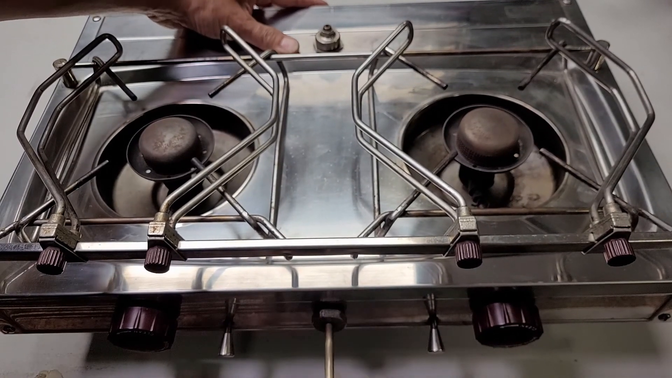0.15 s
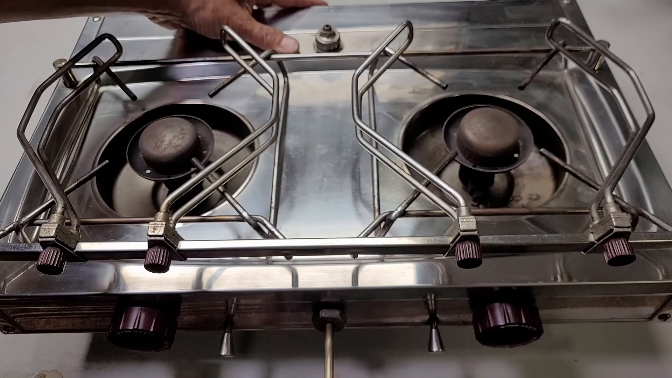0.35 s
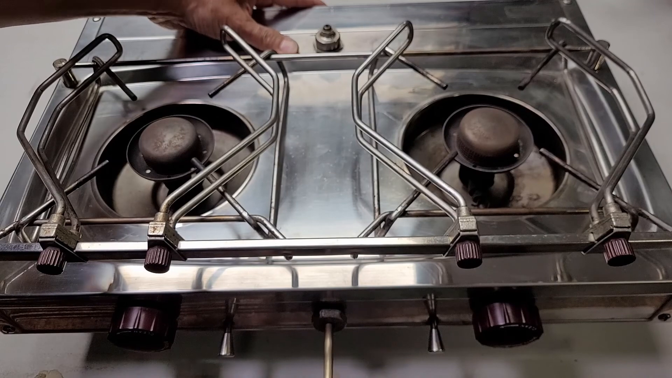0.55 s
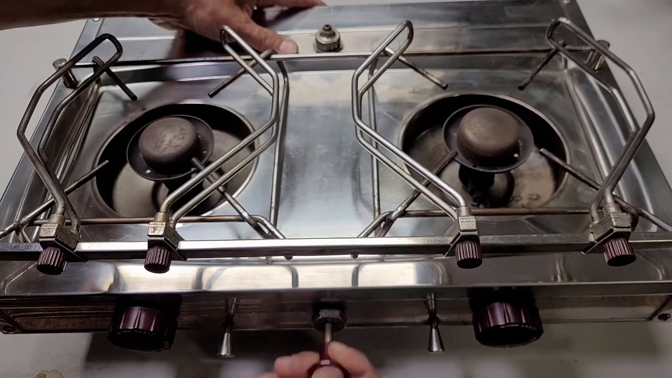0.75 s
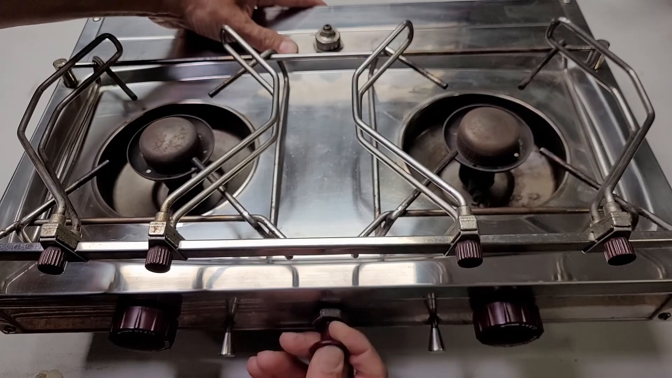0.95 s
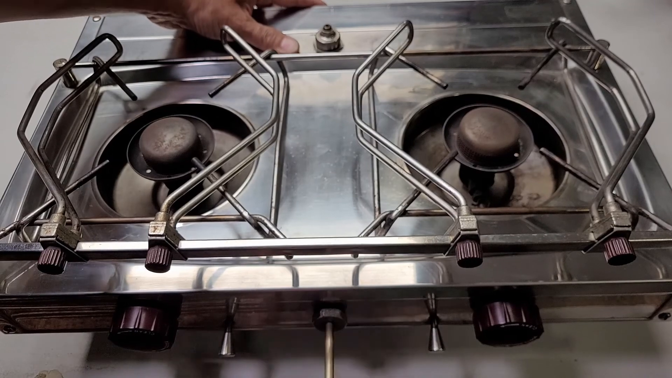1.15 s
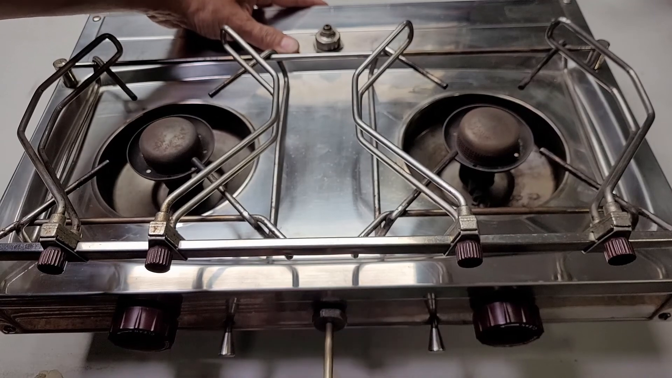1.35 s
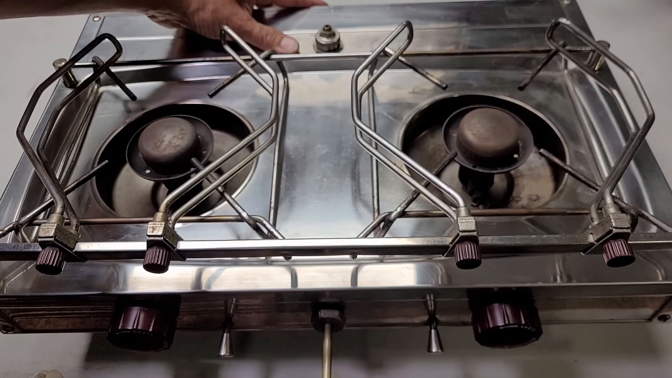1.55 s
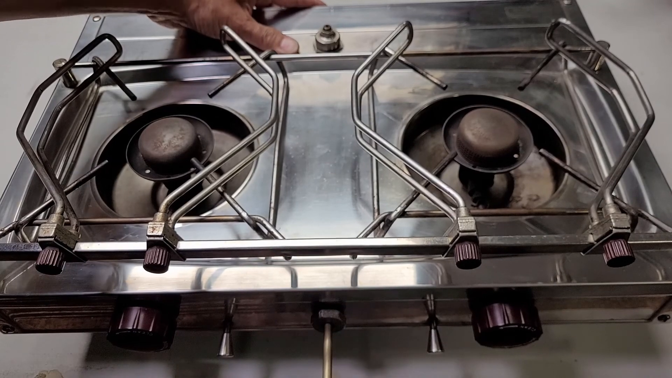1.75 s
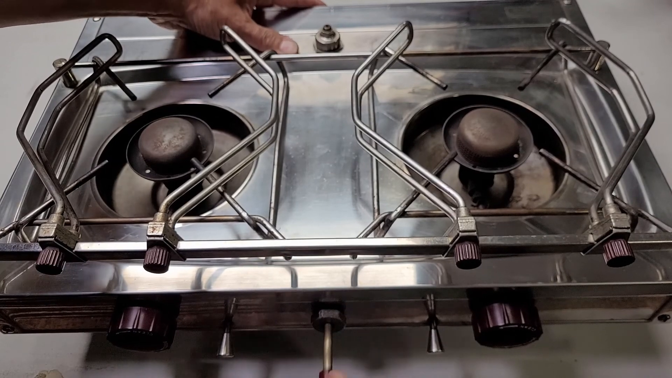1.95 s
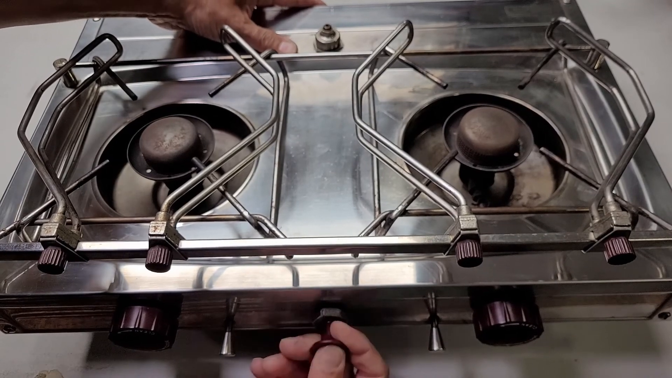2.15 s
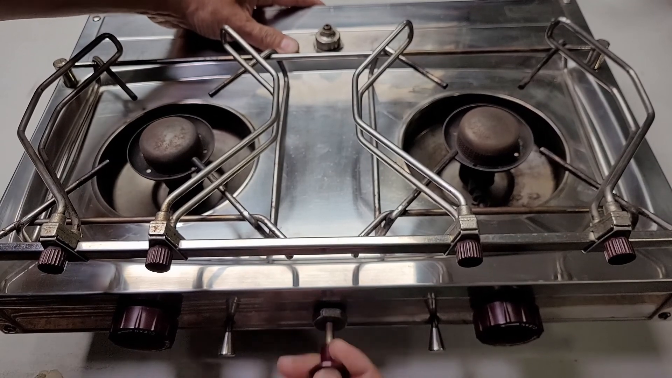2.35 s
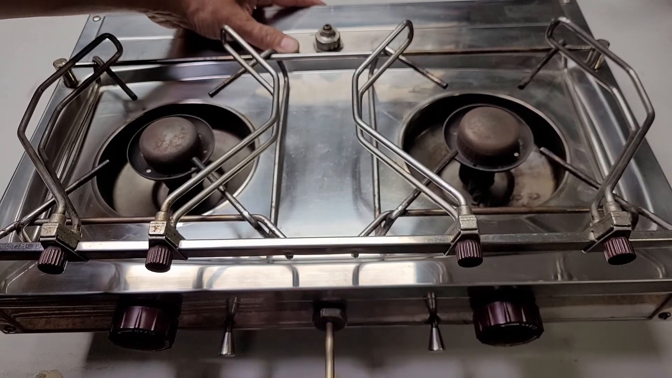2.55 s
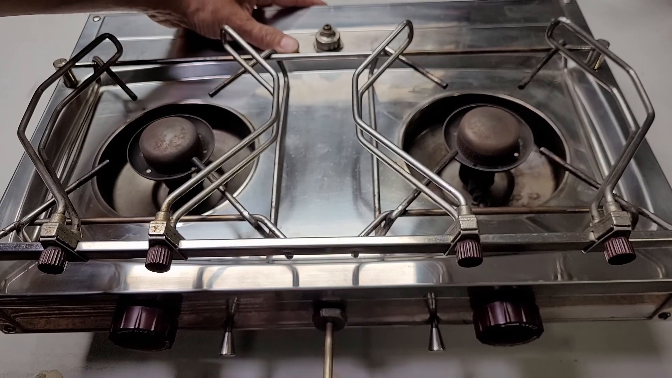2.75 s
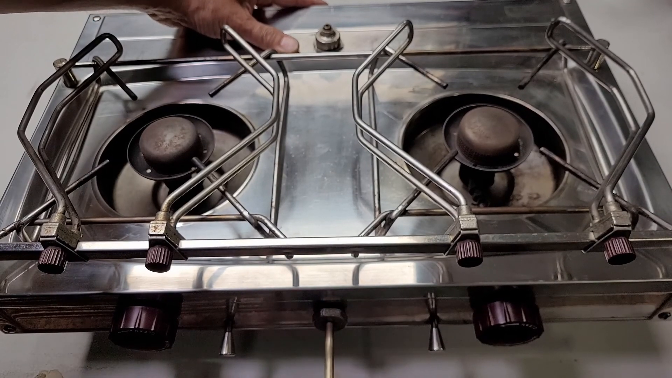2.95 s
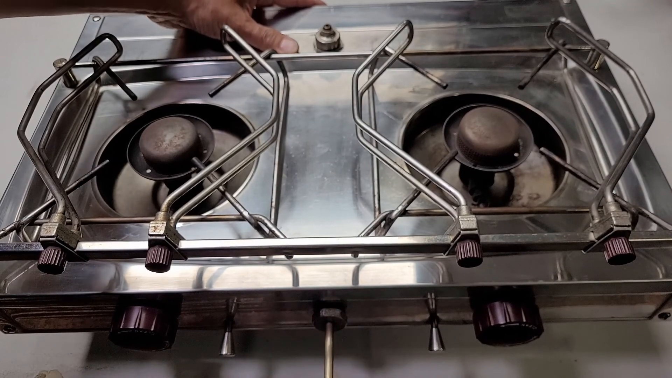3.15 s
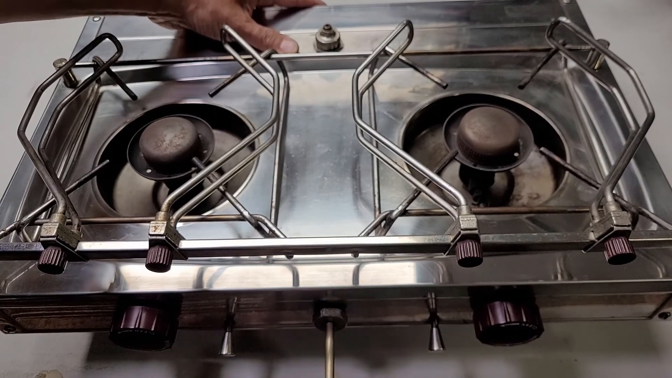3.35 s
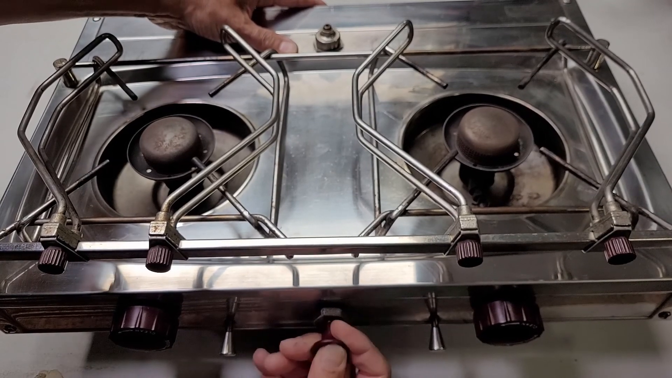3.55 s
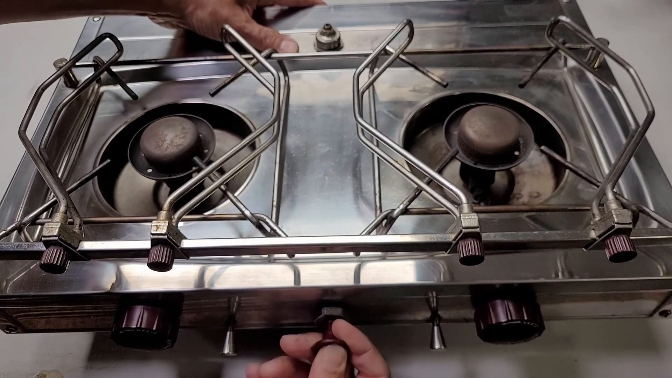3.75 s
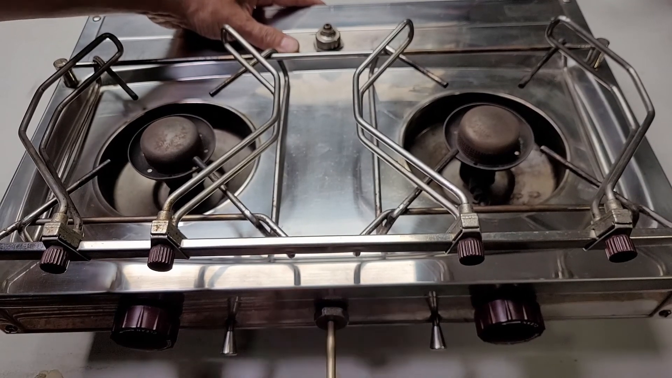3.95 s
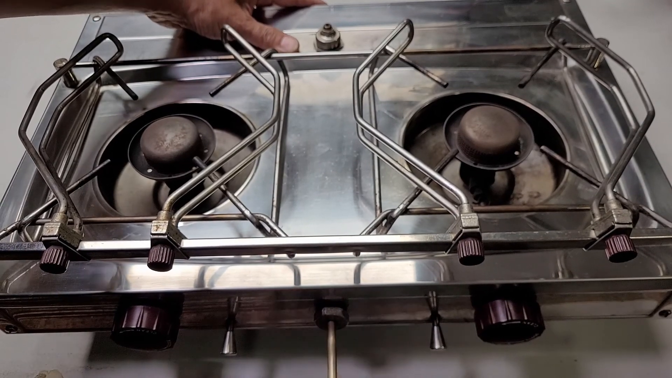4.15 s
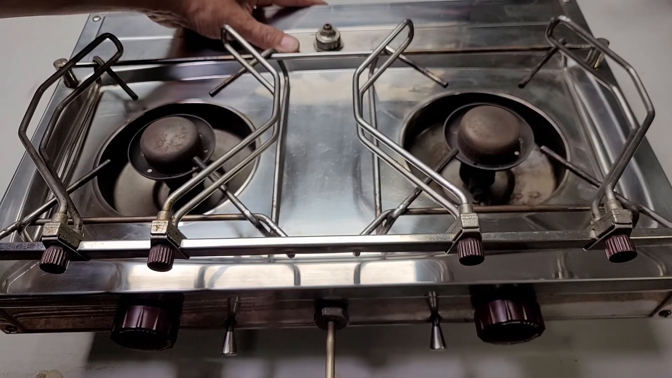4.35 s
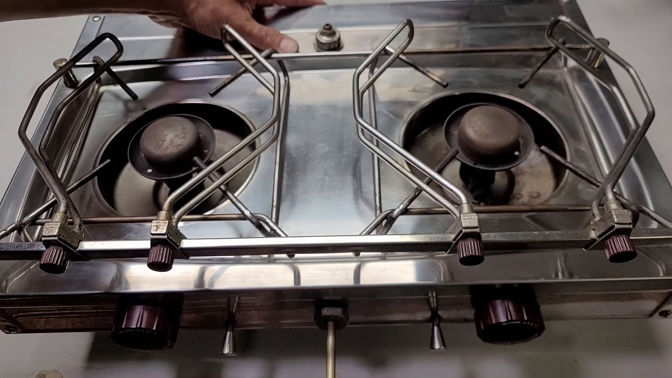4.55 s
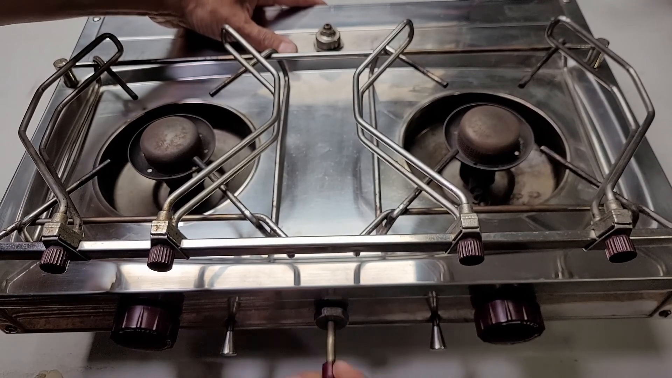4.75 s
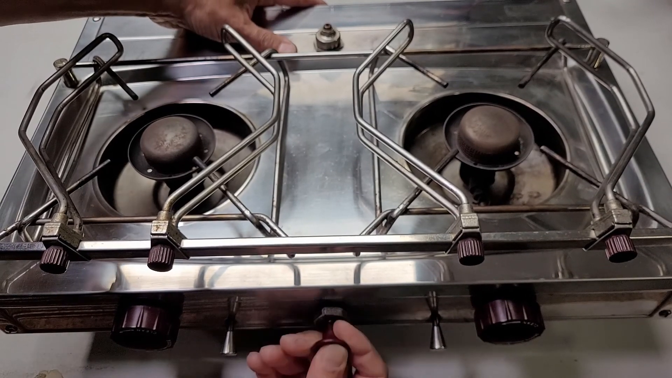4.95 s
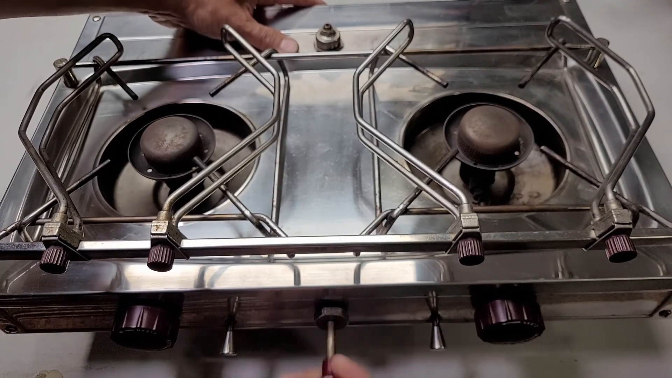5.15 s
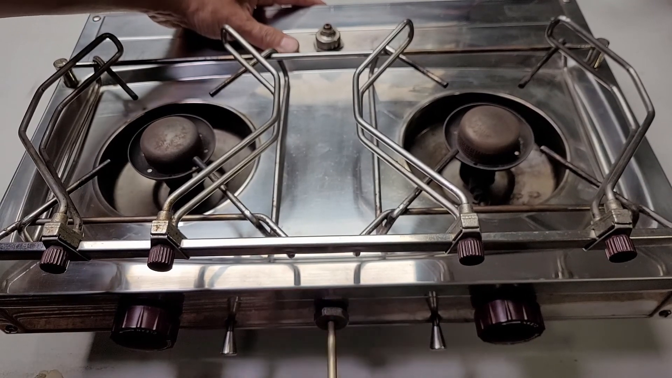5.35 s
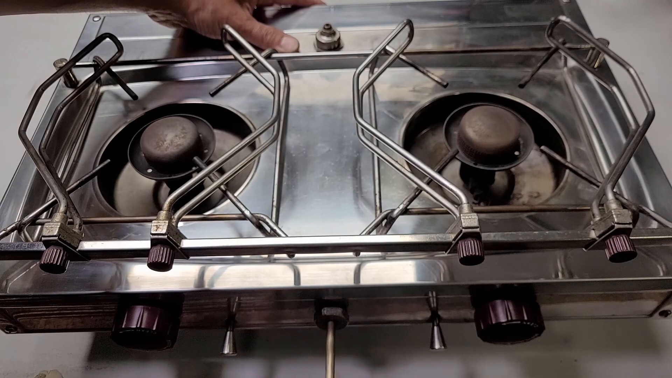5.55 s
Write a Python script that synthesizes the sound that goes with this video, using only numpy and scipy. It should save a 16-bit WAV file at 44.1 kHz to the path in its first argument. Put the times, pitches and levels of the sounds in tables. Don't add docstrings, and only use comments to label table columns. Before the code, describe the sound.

A metal pump rod hisses and judders through its sleeve, slamming home with loud clangs that rattle a sheet-steel stove, close up.

```python
import sys
import numpy as np
from scipy import signal
from scipy.fft import rfft, irfft
from scipy.io import wavfile
from scipy.ndimage import uniform_filter1d

SR = 44100
rng = np.random.default_rng(int(sys.argv[2]) if len(sys.argv) > 2 else 0)


def attenuation_scalar(level_db):
    decades = np.asarray(level_db, float) / 20
    return 10 ** decades


def output_pcm(signal):
    pcm = np.clip(np.atleast_2d(signal).T, -1, 1) * 32767
    wavfile.write(sys.argv[1], SR, np.round(pcm).astype(np.int16))


N = 247401

ALIKE_HZ = 640
LEFT_LAG_S = .0001
BREAK_DB_S, TUG_DB_S = 5000, 2200
PULL_FADE_DB_S, RING_FADE_DB_S = 203, 286

# t/s, peak level/dB, tank level over peak/dB, treble tilt/(dB per octave), rattle/s
SLAMS = [(0.425, -27.5, 2, 3, 0.023), (0.885, -6.5, -7.5, 1.5, 0.03), (1.592, -62, 7, -2.5, 0.046),
         (2.886, -65.5, -5, 3, 0.0064), (2.118, -6, -16.5, 2.5, 0.021), (2.405, -41.5, 8, -4, 0.008),
         (2.965, -60.5, -6.5, -7.5, 0.013), (3.385, -47.5, -14, -1, 0.022), (3.621, -6, -22.5, 2.5, 0.018),
         (4.346, -72.5, 16, 12, 0.01), (4.976, -16.5, 8.5, -0.5, 0.018), (5.202, -45.5, 14, -8, 0.019)]
# t/s, level/dB
REBOUNDS = [
    (0.897, -15.5),
    (0.911, -15),
    (2.138, -9.5),
    (2.146, -14.5),
    (3.641, -11.5),
    (3.648, -14.5),
    (5.012, -28),
]
# t/s, effort level/dB, delay until the washer catches/s
PULLS = [
    (0.0, -43, .05),
    (1.366, -48, .062),
    (2.698, -46, .063),
    (4.176, -48.5, .064),
]
# t/s, peak level/dB
JUDDERS = [
    (0.745, -19),
    (.768, -19.5),
    (.785, -12.5),
    (.82, -7.5),
    (.862, -4),
    (2.066, -11.5),
    (2.091, -6),
    (2.105, -7.5),
    (3.59, -9.5),
    (3.605, -3),
]
# f/Hz, level/(dB per Hz)
CLANG = [(24, -60), (40, -26.5), (155, -15.5), (297, -2.5), (516, -15), (896, -3), (1300, -8.5),
         (1480, -6.5), (1810, -9), (3650, -15.5), (5050, -22), (7540, -23.5), (10400, -31.5), (13100, -29),
         (16000, -33.5)]


def lags(seconds):
    return np.arange(int(seconds * SR)) / SR


def unit(x):
    return x / np.sqrt(np.mean(x ** 2))


def across(table, hz):
    table_hz, values = np.array(table).T
    return np.interp(np.log(np.maximum(hz, 1)), np.log(table_hz), values)


def band(x, hz, width):
    edges = np.clip([hz - width / 2, hz + width / 2], 20, SR * .49)
    return signal.sosfilt(signal.butter(2, edges, "band", fs=SR, output="sos"), x)


def ports(size, colour=None):
    hz = np.fft.rfftfreq(size, 1 / SR)
    apart = 0.023 + 1 / (1 + (ALIKE_HZ / np.maximum(hz, 1)) ** 3.8)
    mid, side = rfft(rng.standard_normal((2, size)))
    pair = mid + np.sqrt(apart) * side * np.array([[1], [-1]])
    tint = 1 if colour is None else attenuation_scalar(across(colour, hz))
    return unit(irfft(pair / np.sqrt(1 + apart) * tint, size))


def modes(table, spread, rise_s, against):
    hz, db, t60 = np.array(table).T[:, :, None]
    t, order = lags(1.), np.arange(len(table))[:, None]
    skew = spread * np.clip(hz / ALIKE_HZ, .33, 2) ** 2
    skew = skew * rng.uniform(0.62, 0.66, (len(table), 1)) * (-1) ** order
    phase = 2 * np.pi * hz * t + np.array([skew, -skew])
    ring = np.sum(against ** order * attenuation_scalar(db - 60 * t / t60) * np.sin(phase), axis=1)
    return ring * (1 - np.exp(-t / rise_s)) ** 2 / np.sqrt(np.sum(attenuation_scalar(db) ** 2))


def wash(colour, rise_s, quicker):
    # f/Hz, t60/s
    fade_times = [(60, 0.51), (250, 0.33), (1000, 0.22), (3000, 0.21), (8000, 0.15), (16000, 0.048)]
    t, noise, out = lags(1.), ports(SR, colour), 0
    for hz in 45 * 2 ** np.arange(0, 9, .5):
        out = out + band(noise, hz, hz * .35) * attenuation_scalar(-60 * t * quicker / across(fade_times, hz))
    return out * (1 - np.exp(-t / rise_s))


def play(force, ring):
    return signal.fftconvolve(np.atleast_2d(force), ring, axes=1)[:, :N]


def steady(ring):
    return ring / np.sqrt(np.sum(ring ** 2) / 2)


def taps(times, sizes, push_s):
    force = np.zeros(N)
    np.add.at(force, np.clip((np.asarray(times) * SR).astype(int), 0, N - 1), sizes)
    push = np.sin(np.pi * lags(push_s) / push_s)
    return np.convolve(force, push / push.sum())[:N]


def slips(rate, scatter_db):
    chance = rng.random((3, N))
    size = attenuation_scalar(-scatter_db * np.log(1 - chance[2]))
    return unit((chance[0] < rate / SR) * np.sign(chance[1] - .5) * size)


def flicker(rate, depth_db):
    k = int(SR / rate)
    return attenuation_scalar(depth_db * uniform_filter1d(np.repeat(rng.standard_normal(N // k + 1), k), k)[:N])


def patchy(colour, rate, depth_db):
    noise, out = ports(N, colour), 0
    for hz in 1900 * 2 ** np.arange(0, 3.5, .5):
        out = out + band(noise, hz, hz * .35) * flicker(rate, depth_db)
    return unit(out)


def swells(s, db, rise_db_s, fall_db_s, hold_s=0):
    late = np.arange(N * 1000 // SR + 2)[:, None] / 1000 - s
    level = db + rise_db_s * np.minimum(late, 0) - fall_db_s * np.maximum(late - hold_s, 0)
    return np.sum(attenuation_scalar(2 * level), axis=1)


def slow(s, spread_s, db):
    late = (np.arange(N * 1000 // SR + 2)[:, None] / 1000 - s) / np.abs(spread_s)
    late = np.abs(late / np.where(late < 0, 0.89, 1))
    return np.sum(attenuation_scalar(2 * (db - 16.5 * late ** 1.47)), axis=1)


def gain(power):
    return np.interp(np.arange(N) / SR * 1000, np.arange(len(power)), np.sqrt(power))


def fast_moves(push_db, pull_db, push_fade_db_s, pull_fade_db_s):
    # start t/s, length/s, effort level/dB
    pushes = [
        (0.745, 0.15, -35.5),
        (2.069, 0.084, -35),
        (3.592, 0.032, -30.5),
    ]
    s, length, effort_db = np.array(pushes).T
    pull_s, pull_effort_db, _ = np.array(PULLS).T
    push = swells(s, effort_db + push_db, BREAK_DB_S, push_fade_db_s, length)
    return push + swells(pull_s, pull_effort_db + pull_db, TUG_DB_S, pull_fade_db_s)


def washer():
    # t/s, length/s, start f/Hz, end f/Hz, level/dB
    squeaks = [(1.26, .06, 3950, 4050, -66), (1.325, .03, 12300, 12900, -62), (1.585, .07, 1495, 1480, -60),
               (2.886, .015, 8300, 8500, -72), (2.922, .04, 11300, 12500, -58),
               (2.965, .012, 15500, 15700, -54), (4.43, .07, 1420, 1410, -64),
               (4.5, .015, 14900, 14300, -62), (4.85, .11, 320, 400, -58), (5.372, .03, 13000, 15300, -57),
               (5.402, .035, 10300, 11000, -59), (5.41, .025, 14900, 15700, -56),
               (5.43, .045, 13100, 13000, -59), (5.445, .04, 1500, 1490, -53),
               (-.01, .04, 12900, 13000, -38), (1.36, .03, 12950, 13050, -41),
               (4.166, .03, 12900, 13000, -49)]
    t, out = np.arange(N) / SR, np.zeros((2, N))
    wobble = flicker(rate=200, depth_db=.04)
    grip = flicker(rate=150, depth_db=3.5)
    for s, length, from_hz, to_hz, db in squeaks:
        along = np.clip((t - s) / length, 0, 1)
        pitch = (from_hz + (to_hz - from_hz) * along ** 0.395) * wobble
        phase = 2 * np.pi * np.cumsum(pitch) / SR
        shift = np.array([[0], [1.1 - 2 * np.pi * to_hz * LEFT_LAG_S]])
        out += attenuation_scalar(db + 3) * grip * np.sin(np.pi * along) * np.sin(phase + shift)
    return out + attenuation_scalar(-13) * play(out[0], steady(wash(None, rise_s=.003, quicker=2.5)))


def sliding():
    # t at fastest/s, spread/s, hiss level/dB, rod ring level over hiss/dB
    creeps = [(.24, 0.072, -75.5, 11), (.4, 0.036, -68, 12), (.588, 0.16, -67.5, 1),
              (1.154, 0.32, -65, -10), (1.319, 0.17, -59, -18), (1.773, .15, -65.5, -3),
              (2.03, 0.56, -75, 4), (2.417, 0.12, -69.5, -5), (2.598, 0.2, -63, -17),
              (2.889, 0.019, -75, 12), (2.972, 0.077, -64, 2.5), (3.242, 0.098, -72.5, 2),
              (3.415, .3, -73, 1.5), (3.561, 0.21, -78, 3.5), (3.9, 0.29, -66.5, -8),
              (4.12, 0.286, -65, -12), (4.351, .05, -78.5, -0.5), (4.541, 0.23, -66.5, 0.5),
              (4.9, .2, -75, 9.5), (5.08, 0.21, -66, -15.5), (5.215, 0.051, -66.5, 2),
              (5.309, 0.14, -59.5, -4), (5.445, 0.098, -59, 0)]
    # t at release/s, level/dB
    leans = [(.725, -69), (1.3, -74), (1.77, -69.5), (2.045, -66.5), (2.589, -77), (2.971, -66),
             (3.575, -60.5), (4.54, -64), (4.86, -64.5), (4.96, -59.5), (5.21, -72.5), (5.425, -63)]
    # t/s, level/dB
    sleeve_strikes = [
        (0.427, -37),
        (4.977, -37),
    ]
    s, spread_s, db, ring_db = np.array(creeps).T
    creep = slow(s, spread_s, db)
    lean = swells(*np.array(leans).T, rise_db_s=140, fall_db_s=260.5)
    lean += swells(*np.array(sleeve_strikes).T, BREAK_DB_S, RING_FADE_DB_S)
    hiss = fast_moves(0, 0, 153, PULL_FADE_DB_S) + creep
    sleeve = fast_moves(-6.5, -5, 306, RING_FADE_DB_S) + lean + creep * attenuation_scalar(2 * -11)
    ring = fast_moves(-2, 6, 306, RING_FADE_DB_S) + slow(s, spread_s, db + ring_db)
    return gain(hiss), gain(sleeve), gain(ring)


def rod():
    # f/Hz, level/(dB per Hz)
    fast_colour = [(1060, -43), (1800, -17), (2180, -5.5), (2590, -15.5), (3200, -4.5), (3540, -10.5),
                   (4100, -6.5), (5200, -2), (6900, 8), (8440, -5), (12300, -4.5), (13400, 1.5),
                   (16000, -20.5)]
    creep_colour = [(1060, -28.5), (1800, -7.5), (3640, -2), (3990, -10.5), (4920, -4), (6900, -3.5),
                    (9000, -7), (9770, -7), (10900, -18), (13300, -8), (16000, -25)]
    # f/Hz, width/Hz, level/dB
    ring_bands = [(4000, 250, -10), (9900, 420, -4), (13000, 260, -2.5)]
    hiss, sleeve, ring = sliding()
    fast = hiss ** 2 / (hiss ** 2 + attenuation_scalar(-47.5) ** 2)
    creep = hiss * np.sqrt(1 - fast)
    bursts = gain(.5 + swells(np.array(JUDDERS)[:, 0], -2, TUG_DB_S, fall_db_s=500))
    out = bursts * hiss * np.sqrt(fast) * attenuation_scalar(3.0) * patchy(fast_colour, rate=90, depth_db=3.5)
    out = out + creep * attenuation_scalar(1.5) * patchy(creep_colour, rate=78, depth_db=1.6)
    above = [np.sqrt(np.maximum(level ** 2 - (hiss * attenuation_scalar(-19)) ** 2, 0)) for level in (sleeve, ring)]
    for (hz, width, db), drive in zip(ring_bands, [creep] + above):
        noise = ports(N)
        locked = .5 + .5 * drive ** 2 / (drive ** 2 + attenuation_scalar(-58) ** 2)
        core = unit(band(noise, hz, width)) * flicker(rate=50, depth_db=3.5)
        skirt = unit(band(noise, hz * 1.06, hz * 0.19))
        out = out + drive * locked * attenuation_scalar(db) * core
        out = out + drive * attenuation_scalar(db + 2.0) * skirt
    return out


def dragging():
    # t at strongest/s, spread/s, shudder level/dB, rub level over shudder/dB
    drags = [(.17, .1, -56, -20), (.49, 0.2, -44.5, -20), (.6, .12, -47, -15), (1.14, 0.077, -37.5, -16),
             (1.292, 0.21, -54, -0.5), (1.62, 0.38, -50.5, -9), (1.826, 0.17, -41, -15),
             (2.34, 0.069, -41, -14), (2.441, 0.04, -48, -21), (2.558, 0.53, -54.5, -2.5),
             (2.96, 0.074, -46, -12.5), (3.11, .05, -60.5, -21), (3.289, 0.12, -46.5, -16.5),
             (3.04, .06, -49.5, -28), (3.45, 0.25, -54, -14), (3.889, 0.11, -40.5, -15),
             (4.1, 0.33, -47, -10.5), (4.467, .3, -50.5, -7.5), (4.639, .2, -50.5, -15.5),
             (4.955, .15, -48, -16), (5.09, 0.21, -42, -17.5), (5.235, 0.075, -31, -42.5),
             (5.351, 0.38, -45, -11.5), (5.525, 0.12, -39, -12)]
    s, spread_s, db, rub_db = np.array(drags).T
    pull_s, pull_db, delay_s = np.array(PULLS).T
    catch = swells(pull_s + delay_s, pull_db + 13.5, BREAK_DB_S, fall_db_s=212, hold_s=0.035)
    shudder = fast_moves(12.5, 9, 153, PULL_FADE_DB_S) + catch + slow(s, spread_s, db)
    rub = fast_moves(-7, 6.5, 153, PULL_FADE_DB_S) + catch * attenuation_scalar(2 * -21)
    rub = rub + slow(s, spread_s, db + rub_db)
    return gain(shudder), gain(rub)


def frame(tank, apron, plate):
    # t/s, peak level/dB, pitch f/Hz
    soft_knocks = [(0.049, -18, 267), (0.237, -37.5, 270), (.584, -31.5, 253), (1.125, -22.5, 234),
                   (1.193, -45, 257), (1.368, -27.5, 283), (1.425, -17, 277), (1.596, -31.5, 259),
                   (1.757, -34.5, 263), (1.833, -42.5, 264.5), (1.893, -47, 324), (2.01, -35.5, 257),
                   (2.285, -27.5, 253), (2.698, -31, 310), (2.76, -20.5, 231), (3.235, -41, 328),
                   (3.271, -36, 227), (3.881, -29, 270), (4.19, -27.5, 267), (4.11, -44, 305),
                   (4.239, -15, 259), (4.404, -38.5, 240), (4.511, -37, 265.5), (4.59, -32.5, 324),
                   (4.894, -42.5, 369), (5.209, -18, 248), (5.273, -29.5, 281), (5.406, -23, 257),
                   (5.446, -19.5, 266), (5.513, -21.5, 313)]
    s, db, hz = np.array(soft_knocks + [(s, db, 313) for s, db in JUDDERS]).T
    shudder, rub = dragging()
    pan = plate * attenuation_scalar(-5.0) + wash(CLANG, rise_s=0.002, quicker=5.7) * attenuation_scalar(7.5)
    front = np.clip((hz - 245) / 80, .05, .95)
    out = play(taps(s, attenuation_scalar(db - 3) * np.sqrt(1 - front), push_s=0.0015), tank)
    out += play(taps(s, attenuation_scalar(db - 2.5) * np.sqrt(front), push_s=.0012), apron)
    out += play(taps(s, attenuation_scalar(db - 14), push_s=0.0008), pan)
    jerks = slips(rate=260, scatter_db=1.5) * flicker(rate=35, depth_db=2.5)
    grit = slips(rate=460, scatter_db=1.0) * flicker(rate=28, depth_db=4.5)
    soft = unit(band(grit, 785, 730))
    hard = shudder ** 2 / (shudder ** 2 + attenuation_scalar(-33) ** 2)
    out += play(shudder * np.sqrt(hard) * attenuation_scalar(-9) * jerks, steady(apron + .3 * tank))
    out += play(shudder * np.sqrt(1 - hard) * attenuation_scalar(-5.5) * jerks, steady(tank + 1.3 * apron))
    return out + play(rub * soft * attenuation_scalar(-8.5), steady(pan - 1.4 * plate * attenuation_scalar(-9.0)))


def wire():
    # t/s, level/dB
    jolts = [
        (.002, -67),
        (.427, -68),
        (.885, -55),
        (1.367, -72),
        (2.119, -53),
        (3.621, -52),
        (4.176, -73),
        (4.976, -65),
    ]
    # f/Hz, level/dB, t60/s
    wire_tones = [(4600, -4, 1.1), (4650, 0, 1.3), (4100, -3, .9)]
    s, db = np.array(jolts).T
    ring = modes(wire_tones, spread=.6, rise_s=.003, against=-1)
    return play(taps(s, attenuation_scalar(db), push_s=.0001), ring) * flicker(rate=40, depth_db=2.6)


def slams(tank, plate):
    # f/Hz, width/Hz, level/dB
    crowded_bands = [(1580, 120, 1), (1900, 170, -3.5), (2290, 180, 2), (2650, 150, -5), (3360, 120, -2),
                     (3600, 200, 4.5), (3950, 120, -4), (4400, 250, 3), (5300, 300, -3), (6900, 330, 3.5),
                     (8200, 220, -3), (11000, 700, -3.5), (14000, 830, 3)]
    clang = wash(CLANG, rise_s=0.0014, quicker=0.71) * attenuation_scalar(-1.6) + plate * attenuation_scalar(-3.0)
    clang[:, :200] += attenuation_scalar(2.) * ports(200, CLANG) * np.exp(-np.arange(200) / 70)
    size = clang.shape[1]
    hz, out = np.fft.rfftfreq(size, 1 / SR), np.zeros((2, N + SR))
    crowd = attenuation_scalar(sum(db * np.exp(-((hz - at_hz) / width) ** 2) for at_hz, width, db in crowded_bands))
    for s, db, tank_db, tilt_db, rattle_s in SLAMS:
        when, strength = rng.random((2, 24))
        chatter = np.zeros(size)
        chatter[(when * 3 * abs(rattle_s) * SR).astype(int)] = 0.16 * (2 * strength - 1) * np.exp(-3 * when)
        chatter[0] = 1.095
        for again_s, again_db in REBOUNDS:
            if 0 < again_s - s < .05:
                chatter[int((again_s - s) * SR)] -= attenuation_scalar(again_db - db)
        tilt = attenuation_scalar(tilt_db * np.log2(np.clip(hz, 500, 16000) / 2000))
        blow = irfft(rfft(clang) * rfft(chatter) * tilt * crowd, size)[:, :-4000]
        out[:, int(s * SR):][:, :blow.shape[1]] += attenuation_scalar(db) * blow
    s, db, tank_db = np.array(SLAMS).T[:3]
    return out[:, :N] + play(taps(s, attenuation_scalar(db + tank_db), push_s=0.002), tank)


def barrel():
    # f/Hz, level/dB, t60/s
    barrel_tones = [(330, -3, .3), (440, -7, .08), (630, -2, .1), (745, -1, .12), (830, -4, .1),
                    (905, -4, .14), (1090, -9, .08), (1500, -7, .15), (3850, -5, .03)]
    s, db = np.array(SLAMS).T[:2]
    ring = modes(barrel_tones, spread=.15, rise_s=.0001, against=1)
    thud = play(taps(s, attenuation_scalar(db - 4), push_s=.0001), ring)
    tick_db = db - 21 + np.minimum(db + 7, 0)
    ticks = slips(rate=300, scatter_db=3) * gain(swells(s + .003, tick_db, BREAK_DB_S, 330, .03))
    tick_ring = wash([(500, -12), (1200, 0), (4000, -4), (9000, -14)], rise_s=.0001, quicker=25)
    return thud + play(ticks, steady(tick_ring))


def bars():
    # f/Hz, level/dB, t60/s
    grate_tones = [(1201, -2, 0.23), (1243, -6, 0.3), (1456, -6, .3), (1511, 0.5, 0.29), (1690, -11, .18),
                   (2094, -7, .3), (2228, -4, .26), (2515, -7, 0.25), (2788, -8.5, 0.099),
                   (3050, -8.5, 0.18), (3520, -5.5, 0.14), (3600, -4.5, 0.14), (3678, -7.5, 0.16),
                   (4280, -10, .25), (4500, -11, .16), (4620, -14, .18), (5160, -14, .15),
                   (6340, -14, 0.25), (6840, -13, .2), (7120, -14, 0.13), (7700, -11.5, .22)]
    collar_tones = [(888, 1, 0.19), (950, 6, 0.14), (2090, -7, .2), (2800, -12, .14), (3160, -10, .16),
                    (3500, -7, .14), (3660, -14, .2), (6430, -16, .18), (6830, -15, .18), (7080, -12, .25),
                    (9100, -7, .2), (9640, -9, 0.098), (9750, -19, .18), (14100, -11, .1)]
    # t/s, level/dB
    stops = [
        (.426, -34),
        (.433, -41),
        (2.934, -62),
        (4.977, -21),
        (4.983, -27),
        (5.014, -34.5),
    ]
    s, db = np.array([row[:2] for row in SLAMS] + REBOUNDS).T
    stop_s, stop_db = np.array(stops).T
    grate_ring = modes(grate_tones, spread=.25, rise_s=.002, against=-1)
    collar_ring = modes(collar_tones, spread=.25, rise_s=.0005, against=-1)
    grates = play(taps(s, attenuation_scalar(db - 6), push_s=.00006), grate_ring)
    collar = play(taps(stop_s, attenuation_scalar(stop_db), push_s=.00006), collar_ring)
    return grates * flicker(rate=60, depth_db=2.0) + collar


def scene():
    # f/Hz, level/dB, t60/s
    tank_tones = [(74.3, -21, 0.62), (94, -25.5, 0.73), (114, -24, .4), (163, -13.5, 0.27),
                  (202, -19.5, 0.19), (238.3, -5.5, 0.59), (261, 4.5, 0.17), (261, 6.5, 0.36)]
    apron_tones = [(300.3, -6, 0.21), (315.2, -1.5, 0.11), (370, -12.5, 0.022), (416.6, -15, 0.31),
                   (473.7, -11, 0.18), (574, -9.5, 0.2), (360, 1, 0.026)]
    plate_tones = [(329, 6, .35), (626, 0, .27), (721, -4, .3), (758, -1, .3), (918, 1, .32), (995, -8, .3),
                   (1077, -5, .25), (1210, -3, .3), (1410, -6, .33), (1491, 0, .3), (1590, -4, .18),
                   (1952, -8, .26), (2106, -5, .3), (2223, -2, .24), (2870, -11, .2), (3040, -11, .25),
                   (3575, -8, .18), (3677, -11, .25), (4094, -11, .25), (4445, -12, .14), (5155, -17, .2),
                   (5300, -19, .3), (7456, -17, .2)]
    tank = modes(tank_tones, spread=0.37, rise_s=0.0011, against=0.89)
    apron = modes(apron_tones, spread=0.37, rise_s=0.0011, against=0.89)
    plate = modes(plate_tones, spread=0.31, rise_s=0.0001, against=-0.962)
    stove = washer() + rod() + frame(tank, apron, plate) + wire()
    stove = stove + slams(0.24 * tank + apron, plate) + barrel() + bars()
    return stove + attenuation_scalar(-92) * ports(N)


def roll_off(x):
    return signal.sosfilt(signal.butter(12, 16850, fs=SR, output="sos"), x)


def record(dry):
    left = np.roll(dry[0], int(LEFT_LAG_S * SR)) * attenuation_scalar(1)
    right = dry[1] * attenuation_scalar(-1)
    pair = np.tanh(1.25 * np.array([left, right])) / 1.25
    pair = signal.sosfilt(signal.butter(2, 85, "high", fs=SR, output="sos"), pair)
    mix = signal.sosfilt(signal.ellip(8, .2, 60, 15900, fs=SR, output="sos"), pair)
    return roll_off(mix)


dry = scene()
out = record(dry)
output_pcm(out)
```